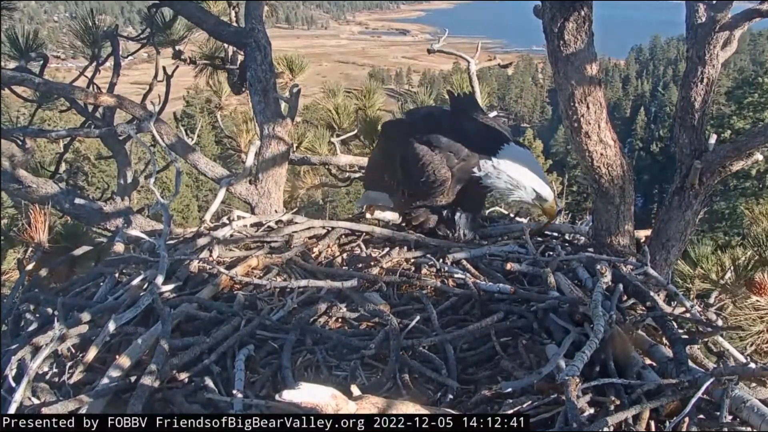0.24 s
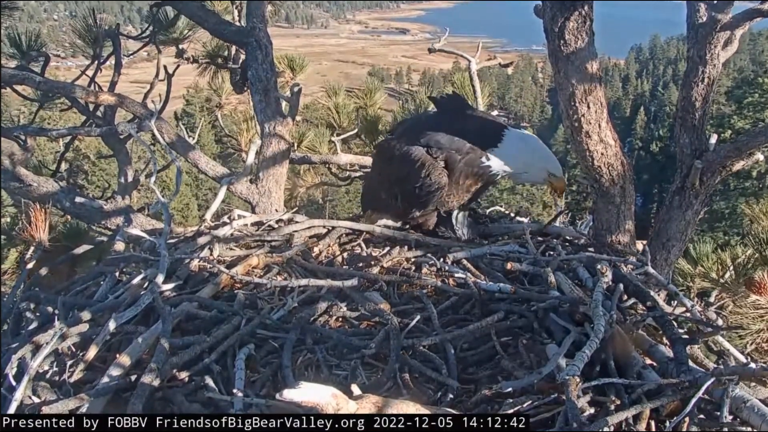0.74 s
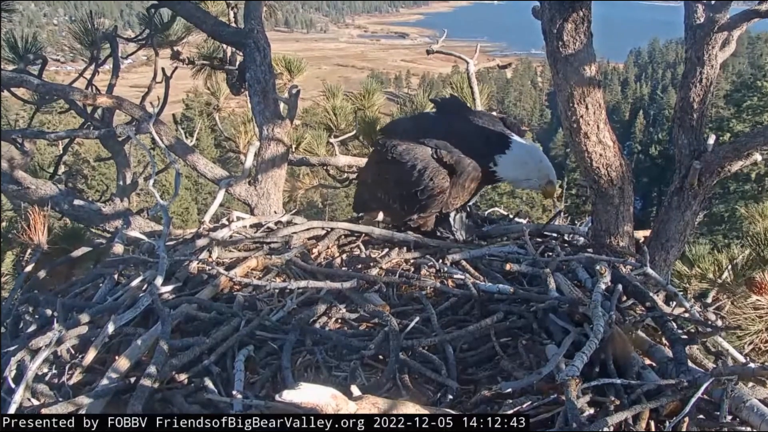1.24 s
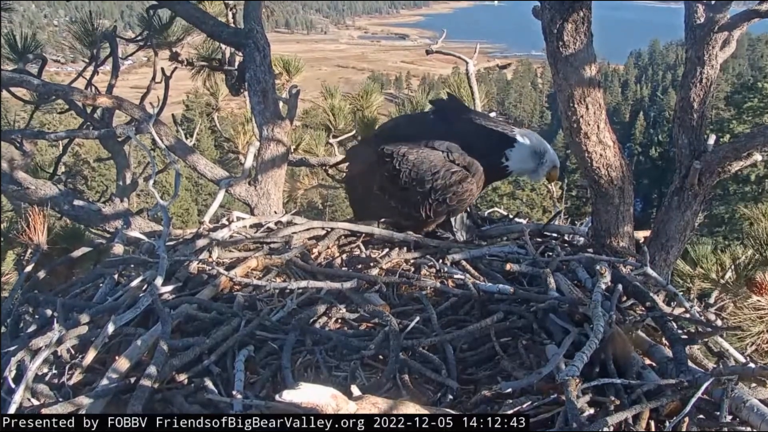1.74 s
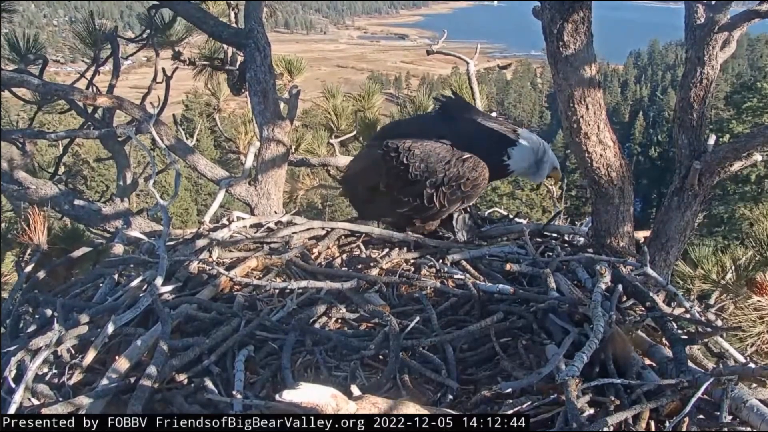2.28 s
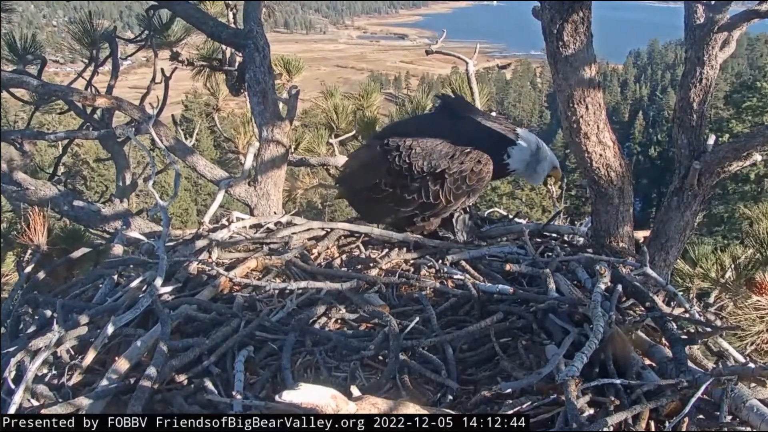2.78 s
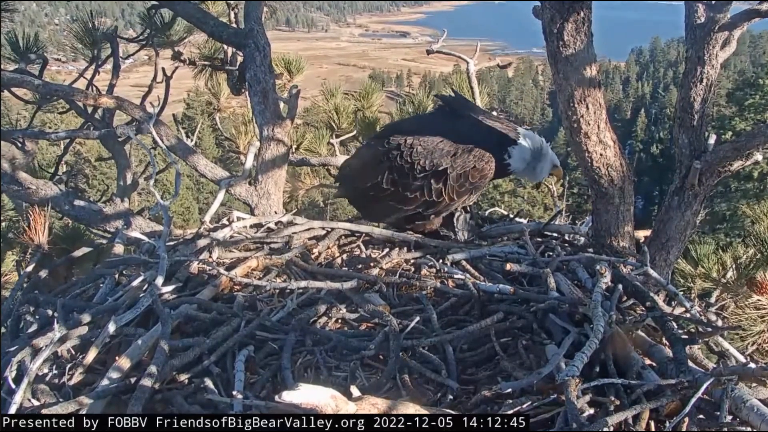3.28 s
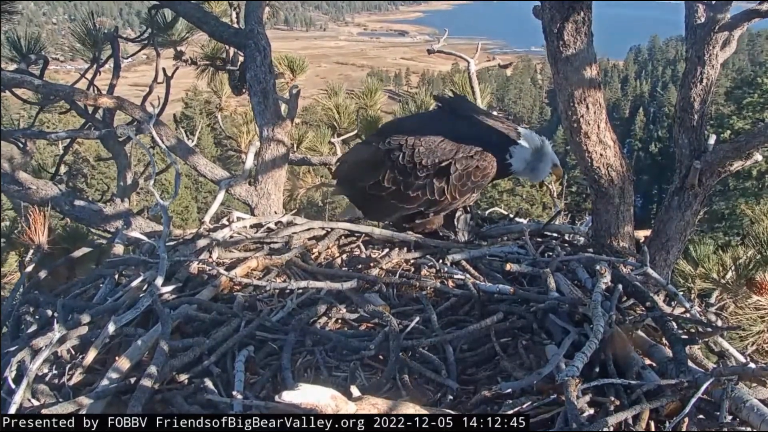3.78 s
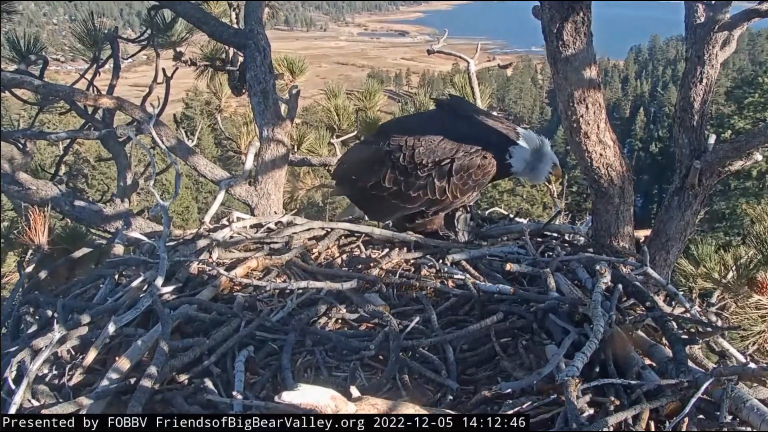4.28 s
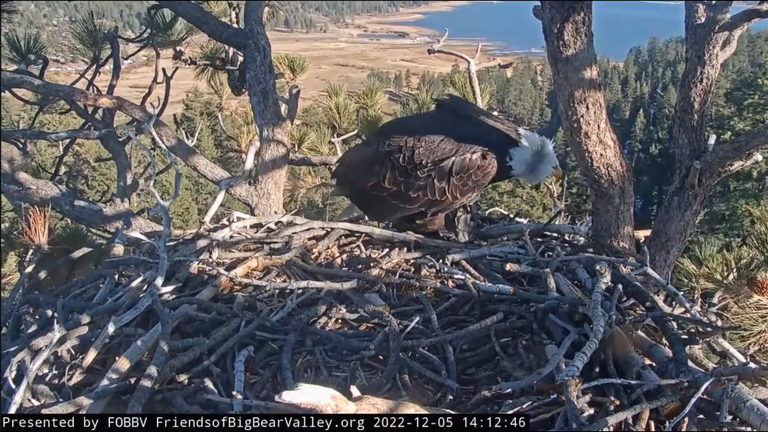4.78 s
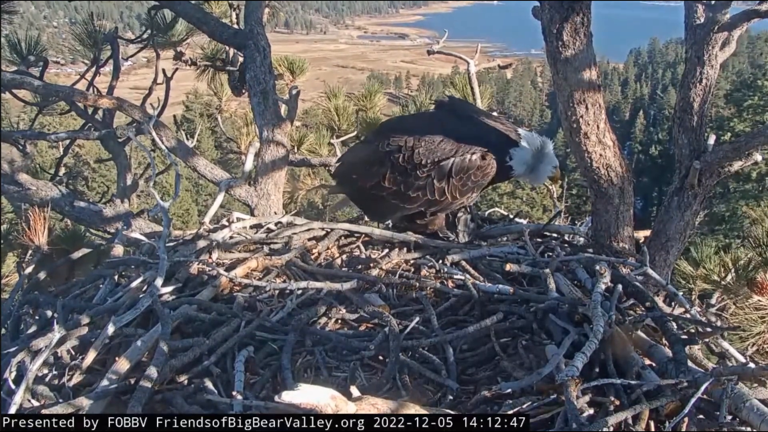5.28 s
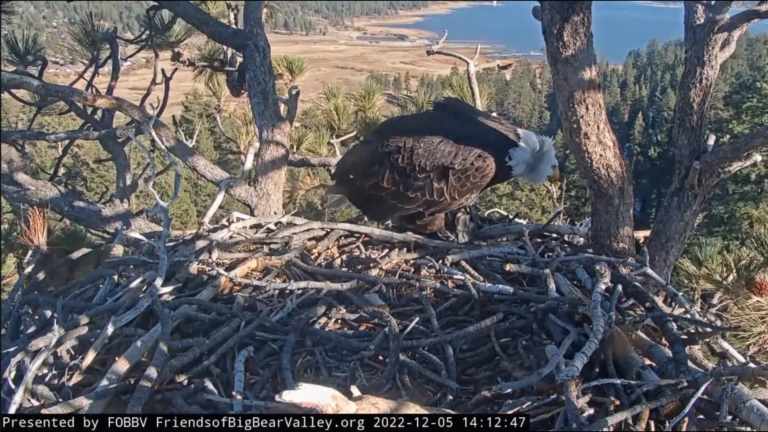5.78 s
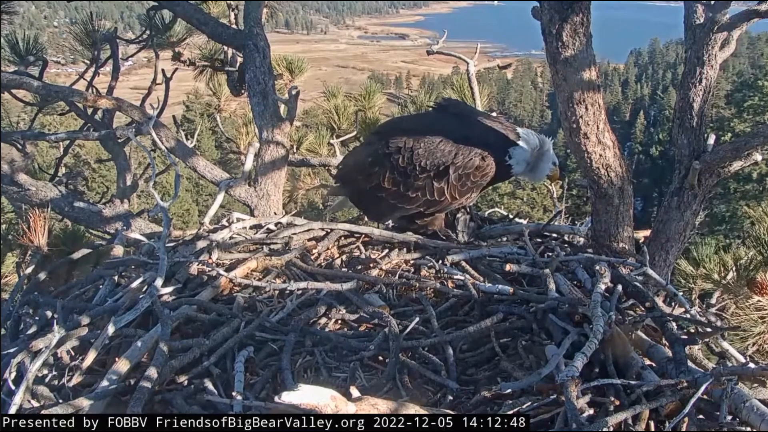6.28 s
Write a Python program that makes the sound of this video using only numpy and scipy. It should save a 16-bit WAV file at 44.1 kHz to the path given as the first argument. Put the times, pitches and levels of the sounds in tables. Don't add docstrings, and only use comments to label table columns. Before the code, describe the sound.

Steady wind rumble and airy hiss surround a large bird of prey calling at close range. Short, squeaky high chirps come in small bursts, then four strong drawn-out calls, the first rough with yelps, the other three evenly spaced. Each jumps from a lower pitch to a bright, gliding squeal. The microphone overloads a little on the peaks, and trees return brief blurred echoes. After the last call, only wind and small woody ticks remain.

```python
import sys
import numpy as np
from scipy import signal
from scipy.fft import rfft, irfft, next_fast_len
from scipy.io import wavfile

SR = 44100
rng = np.random.default_rng(int(sys.argv[2]) if len(sys.argv) > 2 else 0)


def put_to_file(sound):
    columns = np.atleast_2d(sound).T
    safe = np.clip(columns, -1, 1)
    whole_steps = np.round(safe * 32767)
    wavfile.write(sys.argv[1], SR, whole_steps.astype(np.int16))


def decibels_to_gain(level_db):
    exponent = np.asarray(level_db, float) / 20
    return 10 ** exponent


N = 288149

# t/s, f/Hz, level/dB
FIRST_CHIRP_WAVER = [(0.188, 3750, -30), (0.2, 3750, -30), (0.205, 3460, -19.5), (0.212, 3300, -16),
                     (0.219, 3680, -21), (.223, 3820, -27), (.232, 3680, -25.5), (.242, 3850, -28)]
# t/s, f/Hz, level/dB
FIRST_CHIRP_GLIDE = [(.238, 3820, -28), (0.25, 3900, -21), (.268, 4000, -22), (.288, 4150, -27),
                     (0.3, 4200, -20.5), (.322, 4370, -28), (0.36, 4680, -31), (0.412, 5040, -39),
                     (.434, 4770, -42)]

# t/s, length/s, first f/Hz, last f/Hz, level/dB
CHIRPS = [
    (0.428, .03, 3804, 3456, -8),
    (1.124, 0.011, 3843, 3700, -9),
    (1.486, 0.02, 3500, 3750, -13),
    (1.613, 0.02, 3946, 3596, -9.5),
    (1.905, .027, 3560, 3950, -9.5),
    (2.024, 0.017, 4010, 3710, -8.5),
    (2.156, 0.028, 3743, 3764, -10),
]
TAPERS = [
    (1.518, .07, 3830, 4213, -8),
    (1.936, .045, 4043, 4190, -8),
]
ARCHES = [
    (1.036, .093, 3653, 3735, -8.5),
    (2.156, .071, 2886, 3156, -7.5),
]
STUTTERS = [(0.416, .021, 3900, 3845, -17), (0.427, 0.014, 4980, 4200, -18), (0.998, .014, 3280, 3603, -13),
            (1.009, 0.025, 3890, 3840, -17), (1.027, .019, 3900, 4460, -13.5),
            (1.499, 0.027, 3900, 4500, -26.5)]
HOOKS = [(0.453, .033, 3760, 3050, -10), (1.132, 0.032, 3780, 3100, -18), (1.584, .024, 4200, 4090, -26),
         (1.631, .028, 3700, 3100, -15.5), (1.977, .021, 4150, 4050, -28), (2.04, .026, 3910, 3000, -21),
         (2.217, .03, 3250, 3400, -7), (3.468, 0.032, 2880, 2697, -12), (4.226, .028, 2880, 2620, -12),
         (4.994, .028, 2897, 2680, -11.5)]
SQUEAKS = [
    (1.574, 0.048, 5200, 4500, -22),
    (1.968, 0.065, 5225, 4300, -17),
]
SIGHS = [
    (2.77, .033, 1900, 1684, -18.5),
    (3.489, 0.017, 1750, 1600, -23),
    (4.243, 0.023, 1770, 1630, -23),
    (5.011, 0.021, 1850, 1570, -22),
]
BLIPS = [
    (3.018, .036, 1294, 1220, -20),
]
CREAKS = [
    (0.163, .04, 596, 652, -28.5),
    (0.985, 0.02, 641.5, 670, -25.5),
    (1.472, 0.023, 630, 700, -30),
    (1.895, .02, 640, 740, -27),
    (2.138, 0.026, 590, 690, -29.5),
    (3.082, .022, 571.6, 598, -30),
    (3.803, 0.028, 570, 601, -28),
    (4.571, .022, 570, 604, -29.5),
]
YELPS = [(2.56, 0.021, 3720, 4173, -13.5), (2.581, 0.02, 4080, 3930, -17.5), (2.657, .018, 2954, 3200, -20),
         (2.672, .024, 3262, 3336, -14), (2.697, .03, 3340, 3400, -24), (2.694, 0.024, 3983, 4044, -16)]
MURMURS = [
    (2.177, 0.048, 1126, 1150, -4),
]
LOW = [
    (3.088, 0.11, 1150, 1264.5, -1.5),
    (3.81, 0.1, 1170, 1275, -1.5),
    (4.577, .081, 1170, 1275, 0),
]
MAIN = [
    (3.184, 0.26, 1797, 1984, 0.5),
    (4.648, .32, 1797, 1999, 0),
]
FIRST_MAIN = [
    (2.519, 0.254, 1797, 1985, 0),
]
LINGERING = [
    (3.897, .314, 1807, 1985, 0),
]
HALVED = [
    (2.76, 0.03, 959, 890.5, -20),
    (3.433, .042, 983, 960, -10.5),
    (4.202, .03, 977.5, 950, -11.5),
    (4.958, 0.044, 985, 964.5, -10),
]
FLIPS = [
    (2.512, 0.035, 614.4, 605, -23),
    (3.174, 0.035, 625.3, 605, -22),
    (3.888, .03, 624, 609, -23.5),
    (4.637, .034, 614, 606.5, -20),
]
# t/s, f/Hz, level/dB
FIRST_LOW = [(2.219, 1174, -9), (2.236, 1185, -2), (2.32, 1200, -2.5), (2.35, 1218, 0.5), (2.425, 1238, 0),
             (2.445, 1249, -3.5), (2.505, 1270, -3), (2.524, 1272, -1), (2.537, 1262, -14.5)]

# f/Hz, then one level/dB per partial from the first, relative to the note
SOFT_COLOUR = [(3200, 0, -33), (3900, 0, -33), (4300, 0, -39), (5000, 0, -21.5)]
PIPE_COLOUR = [(3000, 0.0037, -31.5), (3700, 0.0028, -20.5), (4000, 0.0048, -29.5), (4200, 0.0027, -19),
               (5200, 0.0031, -37)]
SQUEAK_COLOUR = [(4200, 0.0037, -38), (5200, 0.0014, -58)]
SIGH_COLOUR = [(1700, 0.0015, -10.5, -34)]
BLIP_COLOUR = [(1250, -10, 0, -8.5, -26)]
CREAK_COLOUR = [(640, -29, -23.5, 0.24, -11.5, -4, -13.5), (720, -28.5, -23.5, -2, -3, -5, -16.5)]
LOW_COLOUR = [(1110, -20.5, -42, -42), (1180, -20, -18.5, -20), (1200, -21, -12.5, -22.5),
              (1236, -22.5, -15.5, -17), (1245, -17.5, -19, -16.5), (1262, -15, -16, -22.5),
              (1271, -15, -13.5, -24)]
SHORT_LOW_COLOUR = [(1220, -23.5, -16, -28, -39), (1232, -21, -20, -21, -43),
                    (1263, -19.5, -18, -24.5, -45.5)]
MAIN_COLOUR = [(1819, -11.5, -19.5, -41), (1819.5, -11, -16.5, -32.5), (1838, -16.5, -10.5, -26),
               (1876, -21, -10, -32.5), (1895, -11.5, -13.5, -34), (1924.4, -9.5, -22, -28.5),
               (1948, -9.5, -31, -25.5), (1970, -9, -19.5, -27.5)]
FIRST_COLOUR = [(1800, -12, -19.5, -40), (1825, -10.5, -18, -32), (1844, -15.5, -12, -28),
                (1887, -19, -11.5, -32.5), (1900, -13, -15, -36), (1925, -10, -23, -28),
                (1955, -9, -34, -25), (1977, -10, -20, -27)]
HALVED_COLOUR = [(970, -43, -27, 0, -25, -29.5, -17.5)]
SPLIT_COLOUR = [(980, -22.5, -8.5, -30, -5.5, -15.5, -20.5)]
FLIP_COLOUR = [(610, -23, -30, -14, -12, 0, -14, -11)]

# t/s, length/s, depth/0-1
BREAKS = [(1.522, 0.008, .25), (2.171, .012, .2), (2.524, 0.0096, 0.2), (2.575, .015, .25),
          (2.678, .014, .35), (2.771, 0.013, 0.07), (3.089, 0.007, 0.45), (3.191, 0.0078, 0.4),
          (3.812, 0.006, 0.35), (3.903, .01, 0.3), (4.584, 0.009, 0.5), (4.651, 0.0078, 0.5)]
# t/s, length/s, depth/dB
CATCHES = [(.272, .003, 8), (.293, .003, 6), (.325, .004, 10), (.345, .003, 8), (0.469, .0015, 12),
           (2.7765, .002, 10), (2.786, .002, 10), (4.231, .002, 8), (4.243, .003, 14), (1.048, .001, 11.5),
           (1.1272, .001, 17.5), (1.5005, .0015, 18), (1.504, .0012, 12), (1.6205, .0012, 10),
           (1.631, .002, 15), (1.9293, .0015, 20), (1.934, .002, 18), (1.939, .0012, 15),
           (2.014, .0015, 12.5), (2.018, .001, 12), (2.0253, .002, 15), (2.0407, .0015, 10),
           (2.047, .002, 12), (2.217, .002, 6.5), (2.226, .0015, 14), (2.231, .0012, 11), (2.2368, .002, 9),
           (3.473, .002, 10), (3.492, .002, 12)]
# t/s, length/s, level/dB, centre f/Hz
RASPS = [(0.29, 0.075, -30, 3500), (.28, .06, -58, 7200), (1.016, 0.016, -25, 3258),
         (1.049, 0.005, -15, 3750), (1.147, .015, -33, 3480), (1.512, 0.01, -26.5, 4100),
         (1.932, 0.006, -19, 4000), (2.218, 0.013, -25, 3350), (2.58, 0.018, -25.5, 3930),
         (2.683, 0.016, -23, 3700), (2.785, 0.012, -25, 3500)]
# t/s, length/s, level/dB, f/Hz
THUDS = [
    (2.573, .008, -21, 240),
    (2.612, .01, -29, 200),
    (2.685, .01, -28, 510),
    (2.708, .012, -20, 130),
]
# start t/s, fall time/s
ECHOES = [(.004, 0.019), (0.028, 0.05), (.15, .045), (.19, .04), (.23, .025), (.28, 0.2)]
ECHO_DB = [-10.5, -30, -32, -31, -28, -31]
# f/Hz, level/dB
ECHO_COLOUR = [(20, -41.5), (1500, -6.5), (3000, -7), (3600, -1), (4050, 4.5), (5200, -8.5), (6500, -15),
               (20000, -36)]
# t/s, peak level/dB, centre f/Hz
TWIGS = [(0.1431, -36, 3700), (0.34, -36, 4000), (0.727, -36, 3640), (0.794, -34, 3690),
         (0.9318, -34, 3690), (1.8855, -34, 3530), (3.064, -39, 4800), (3.5753, -37.5, 3840),
         (4.4115, -39, 3870), (5.125, -43, 4600), (5.298, -28.5, 4700), (5.679, -30, 4650),
         (5.743, -28, 3000), (5.779, -42, 5000), (5.8521, -48, 3700), (5.9336, -42, 3670),
         (6.1972, -26.5, 4650), (6.228, -38, 3700), (6.241, -27.5, 3940), (6.246, -38, 3900),
         (6.266, -42, 4000), (6.385, -32, 3300)]
# f/Hz, level/dB per Hz
AIR = [(12, -50), (20, 1), (140, -13), (166, -19), (196, -19.5), (352, -28.5), (393, -27.5), (505, -29),
       (857, -28), (1500, -34), (2090, -40), (3450, -34), (5530, -51.5), (11700, -73.5), (15500, -85.5)]
# t/s, level/dB
GUST = [(0.0, -27), (0.42, -26.5), (1.14, -29), (1.44, -28.5), (2.25, -28.5), (2.38, -27), (2.47, -30.5),
        (4.0, -32), (4.07, -32), (4.18, -30.5), (4.64, -30), (4.75, -29.5), (5.22, -32.5), (5.35, -29),
        (6.53, -33)]
# f/Hz, level/dB
MICROPHONE_CURVE = [(20, 0), (3000, 0),
                    (5000, 4), (8000, 9), (11000, 8.5), (14000, 6.5), (20000, -24)]
CAPSULE_COLOUR = MICROPHONE_CURVE

FLUTTER_HZ = 170
WAVER_S, WAVER_SHARE = .014, .002
SPLIT_S = 0.019
PUSH = 0.97
THROAT_LAG = 0.81
LAG_TURN, LAG_TURN_HZ, LAG_WIDTH_HZ = 2.4, 1888, 14
TWIG_RING_DB, TWIG_RING_S = -1.5, 0.00103
AIR_DB, HISS_DB = -26, -64
OVERLOAD_TOP, PHASE_TURN = 0.41, 0.58


def eagle():
    t = np.arange(N) / SR
    tremble = wobble(40, 190)
    breaking = sum(depth * np.exp(-((t - s) / length) ** 2) for s, length, depth in BREAKS)
    beat = wobble(570, 660) * breaking
    caught_db = sum(db * np.exp(-((t - s) / length) ** 2) for s, length, db in CATCHES)
    # (notes, knee dB, roll-off dB, roughness rad)
    registers = [(chirps(), -11.5, 30, .08), (squeaks_and_sighs(), -14, 14, .1)]
    registers += lead_ins_and_yelps() + low_register() + main_register() + register_flips()
    sung = sum(voice(*register, tremble, beat) for register in registers)
    return rasp() + decibels_to_gain(-caught_db) * sung


def chirps():
    opening = [coloured_note(*np.transpose(part), SOFT_COLOUR, waver_db=2.2)
               for part in (FIRST_CHIRP_WAVER, FIRST_CHIRP_GLIDE)]
    return (opening
            + shaped(TAPERS, PIPE_COLOUR, attack_s=.009, release_s=.016, fade_db=6.0, waver_db=0.5)
            + shaped(CHIRPS, PIPE_COLOUR, attack_s=.009, release_s=0.0017, fade_db=8.5, waver_db=.4)
            + shaped(ARCHES, PIPE_COLOUR, attack_s=0.01, release_s=0.0065, fade_db=16.5, arch_hz=301.1,
                     waver_db=0.5)
            + shaped(STUTTERS, SOFT_COLOUR, attack_s=0.013, release_s=.003, fade_db=7, flutter_db=3)
            + shaped(HOOKS, SOFT_COLOUR, attack_s=.003, release_s=0.028, fade_db=12.5, bend=1.7, flutter_db=8))


def squeaks_and_sighs():
    squeaks = shaped(SQUEAKS, SQUEAK_COLOUR, attack_s=0.0095, release_s=.026, fade_db=14.0, bend=5.5,
                     flutter_db=2.0)
    return squeaks + shaped(SIGHS, SIGH_COLOUR, attack_s=.009, release_s=0.0078, fade_db=13.5)


def lead_ins_and_yelps():
    blips = shaped(BLIPS, BLIP_COLOUR, attack_s=.015, release_s=.02, fade_db=14, waver_db=2.5)
    creaks = shaped(CREAKS, CREAK_COLOUR, attack_s=0.027, release_s=0.0065, fade_db=6.5)
    yelps = shaped(YELPS, PIPE_COLOUR, attack_s=0.0037, release_s=0.0074, fade_db=13)
    return [(blips, -13, 8, .2), (creaks, -14, 3, .1), (yelps, -18, 14, .2)]


def low_register():
    first = [coloured_note(*np.transpose(FIRST_LOW), LOW_COLOUR, waver_db=0.35)]
    first += shaped(MURMURS, LOW_COLOUR, attack_s=0.023, release_s=.014, fade_db=8)
    later = shaped(LOW, SHORT_LOW_COLOUR, attack_s=0.0097, release_s=.011, fade_db=8.5, bend=.22, waver_db=2)
    return [(first, -13, 21, .06), (later, -13, 6, .05)]


def main_register():
    calls = (shaped(MAIN, MAIN_COLOUR, attack_s=0.023, release_s=0.015, fade_db=5.5, bend=1.35, waver_db=0.57)
             + shaped(FIRST_MAIN, FIRST_COLOUR, attack_s=0.022, release_s=.012, fade_db=7.0, bend=1.3,
                      waver_db=0.37)
             + shaped(LINGERING, MAIN_COLOUR, attack_s=.035, release_s=.008, fade_db=4.5, bend=1.75,
                      waver_db=0.6))
    return [(calls, -13.5, 9, .03)]


def register_flips():
    halved = shaped(HALVED, HALVED_COLOUR, attack_s=.006, release_s=.009, fade_db=9, bend=2.2)
    split_rows = [(s, SPLIT_S, hz, hz, db) for s, _, hz, _, db in HALVED]
    split = shaped(split_rows, SPLIT_COLOUR, attack_s=0.0026, release_s=0.0051, fade_db=7.5)
    flips = shaped(FLIPS, FLIP_COLOUR, attack_s=0.015, release_s=.014, fade_db=11.5)
    return [(halved, -14, 9, .03), (split, -14, 5, .05), (flips, -14, 5, .1)]


def shaped(rows, colour, attack_s, release_s, fade_db, bend=1.0, arch_hz=0.0, flutter_db=0.0, waver_db=1.0):
    notes, u = [], np.linspace(0, 1, 64)
    for start, length, first_hz, last_hz, db in rows:
        s = u * length
        hz = first_hz + (last_hz - first_hz) * u ** bend + arch_hz * np.sin(np.pi * u)
        attack = np.maximum(1 - s / attack_s, 0)
        release = np.maximum(1 - (length - s) / release_s, 0)
        level_db = db - fade_db * (attack + release)
        level_db = level_db - flutter_db * np.sin(np.pi * FLUTTER_HZ * s) ** 4
        notes.append(coloured_note(start + s, hz, level_db, colour, waver_db))
    return notes


def coloured_note(s, hz, level_db, colour, waver_db=1.0):
    pitch, *partials_db = np.transpose(colour)
    t = np.linspace(s[0], s[-1], 160)
    knots = np.arange(0, .5, WAVER_S)
    slip, *sway = [np.interp(t - s[0], knots, row) for row in rng.standard_normal((9, len(knots)))]
    hz, level_db = np.interp(t, s, hz), np.interp(t, s, level_db)
    columns = [t, hz * (1 + WAVER_SHARE * waver_db * slip)]
    for k, db in enumerate(partials_db):
        columns.append(level_db + np.interp(hz, pitch, db) + waver_db * np.sqrt(k) * sway[k])
    return np.transpose(columns)


def voice(notes, knee_db, rolloff_db, rough, tremble, beat):
    out = np.zeros(N)
    for note in notes:
        s, hz, *levels_db = np.transpose(note)
        span = slice(int(s[0] * SR), int(s[-1] * SR))
        t = np.arange(N)[span] / SR
        pitch = np.interp(t, s, hz)
        phase = 2 * np.pi * np.cumsum(pitch) / SR + rough * tremble[span]
        levels_db = [np.interp(t, s, db) for db in levels_db]
        effort_db = 10 * np.log10(np.sum(decibels_to_gain(np.array(levels_db)) ** 2, axis=0))
        push_db = PUSH * np.maximum(effort_db - knee_db, 0)
        weakest_db = np.min(levels_db[-2:], axis=0)
        levels_db += [weakest_db - rolloff_db * k for k in (1, 2, 3)]
        lag = THROAT_LAG + LAG_TURN * (1 + np.tanh((pitch - LAG_TURN_HZ) / LAG_WIDTH_HZ)) / 2
        tone = sum(decibels_to_gain(db) * np.sin(k * phase - lag * (k % 2 == 0))
                   for k, db in enumerate(levels_db, 1) if k * hz.max() < .4 * SR)
        edges = np.clip(np.minimum(t - s[0], s[-1] - t) / .005, 0, 1)
        out[span] += np.sqrt(2) * tone * decibels_to_gain(push_db) * edges * (1 + beat[span])
    return out


def rasp():
    t, air = np.arange(N) / SR, rng.standard_normal(N)
    out = 0
    for s, length, db, hz in RASPS:
        throat = signal.butter(4, [hz * .82, hz * 1.18], "band", fs=SR, output="sos")
        out = out + decibels_to_gain(db) * np.exp(-((t - s) / length) ** 2) * rms_one(signal.sosfilt(throat, air))
    return out


def thuds():
    t = np.arange(N) / SR
    return sum(decibels_to_gain(db) * np.exp(-((t - s) / length) ** 2) * np.sin(2 * np.pi * hz * (t - s))
               for s, length, db, hz in THUDS)


def forest(x):
    t = np.arange(int(1.6 * SR)) / SR
    scatter = rng.standard_normal((len(ECHOES), len(t)))
    reply = 0
    for (start, fall), db, grains in zip(ECHOES, ECHO_DB, scatter):
        shape = (t > start) * np.exp(-np.maximum(t - start, 0) / fall)
        reply = reply + decibels_to_gain(db) * grains * shape / np.sqrt(np.sum(shape ** 2))
    swaying = 1 + .3 * wobble(20, 130)
    return coloured(swaying * signal.fftconvolve(x, reply)[:N], ECHO_COLOUR)


def twigs():
    out, t = np.zeros(N), np.arange(500) / SR
    ring_shape = (t / TWIG_RING_S) * np.exp(-t / TWIG_RING_S)
    crackle_shape = (t / .001) * np.exp(-t / .001)
    for (s, db, hz), grain in zip(TWIGS, rng.standard_normal((len(TWIGS), 500))):
        wood = signal.butter(2, [hz * .72, hz * 1.6], "band", fs=SR, output="sos")
        crackle = rms_one(signal.sosfilt(wood, grain)) + .015 * grain
        at = int((s - .001) * SR)
        out[at:at + 500] += decibels_to_gain(db + 8.5 + TWIG_RING_DB) * np.sin(2 * np.pi * hz * t) * ring_shape
        out[at:at + 500] += decibels_to_gain(db + 6.0) * crackle * crackle_shape
    return coloured(out, CAPSULE_COLOUR, sign=-1)


def wind():
    air = decibels_to_gain(AIR_DB) * rms_one(coloured(rng.standard_normal(N), AIR))
    air = coloured(air, CAPSULE_COLOUR, sign=-1)
    rumble = signal.sosfiltfilt(signal.butter(1, 330, fs=SR, output="sos"), air)
    hiss = air - rumble
    s, gust_db = np.transpose(GUST)
    gust_db = np.interp(np.arange(N) / SR, s, gust_db + 28.5)
    lumpy_rumble = rumble * decibels_to_gain(gust_db + 1.0 * wobble(6.1, 9))
    return lumpy_rumble + hiss * decibels_to_gain(0.85 * gust_db + 1.2 * wobble(2.2, 9.1))


def rms_one(x):
    return x / np.sqrt(np.mean(x ** 2) + 1e-20)


def coloured(x, points, sign=1):
    size = next_fast_len(len(x))
    hz = np.maximum(np.arange(size // 2 + 1) * SR / size, 1)
    table = np.array(points)
    curve_db = np.interp(np.log(hz), np.log(table[:, 0]), table[:, 1])
    return irfft(rfft(x, size) * decibels_to_gain(sign * curve_db), size)[:len(x)]


def wobble(low_hz, high_hz):
    band = signal.butter(2, [low_hz, high_hz], "band", fs=SR, output="sos")
    return rms_one(signal.sosfilt(band, rng.standard_normal(N)))


def scene():
    bird = eagle()
    return np.tile(bird + forest(bird) + twigs() + wind() + thuds(), (2, 1))


def low_pass(x):
    return signal.sosfilt(signal.butter(12, 15710, fs=SR, output="sos"), x)


def record(dry):
    fine = signal.resample_poly(dry[0], 3, 1)
    bent = OVERLOAD_TOP * fine / (OVERLOAD_TOP ** 12 + fine ** 12) ** (1 / 12)
    mono = coloured(signal.resample_poly(bent, 1, 3)[:N], CAPSULE_COLOUR)
    mono = signal.lfilter([-PHASE_TURN, 1], [1, -PHASE_TURN], mono - np.mean(mono))
    mono = mono + decibels_to_gain(HISS_DB) * wobble(5500, 13000)
    mono = signal.sosfilt(signal.cheby2(10, 50, 15900, fs=SR, output="sos"), mono)
    finished = np.tile(np.clip(mono, -1, 1), (2, 1))
    return low_pass(finished)


dry = scene()
out = record(dry)
put_to_file(out)
```